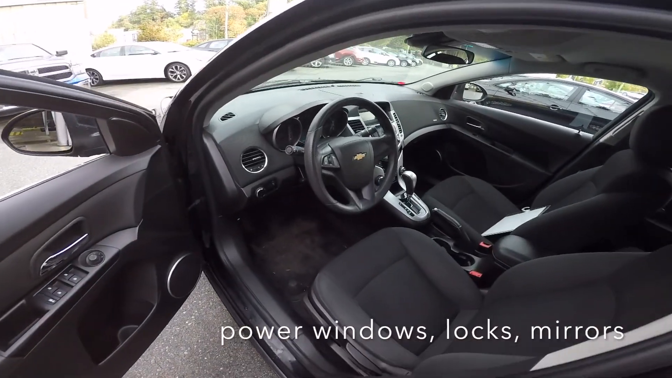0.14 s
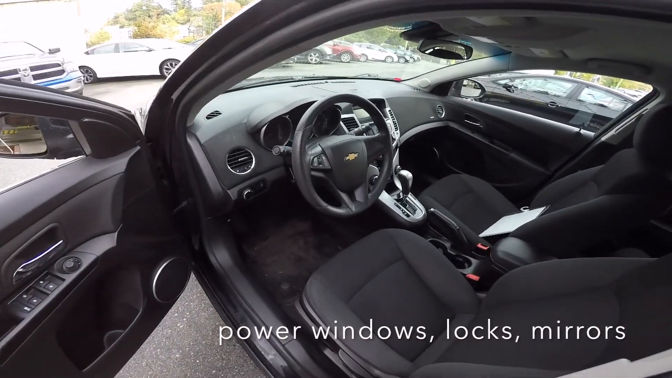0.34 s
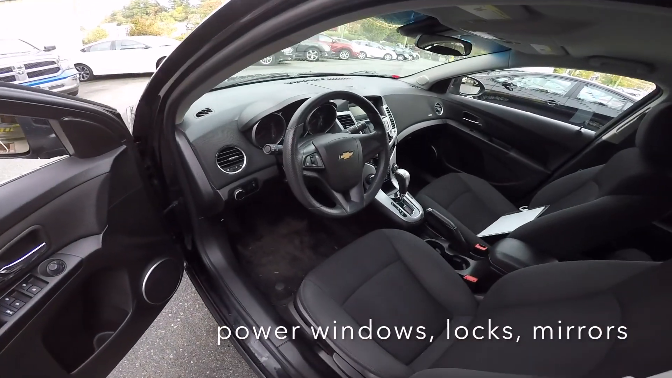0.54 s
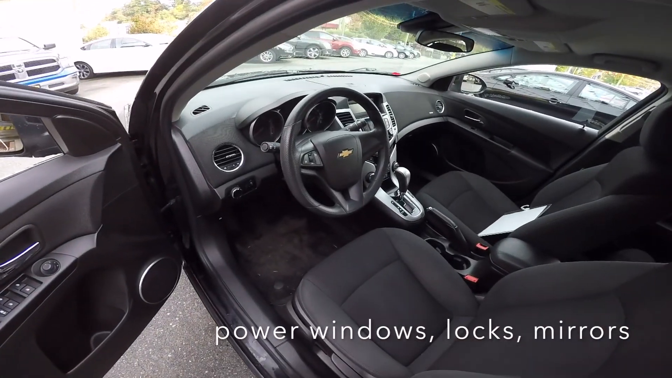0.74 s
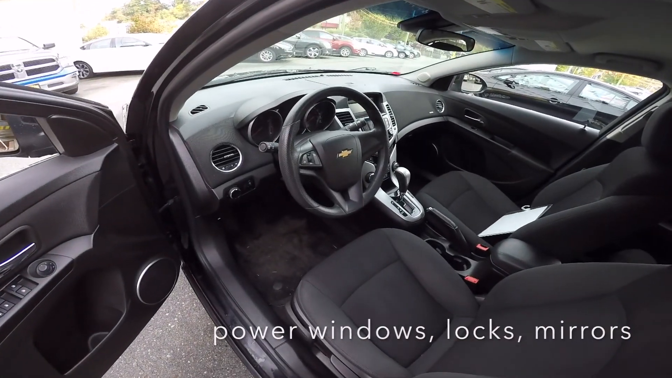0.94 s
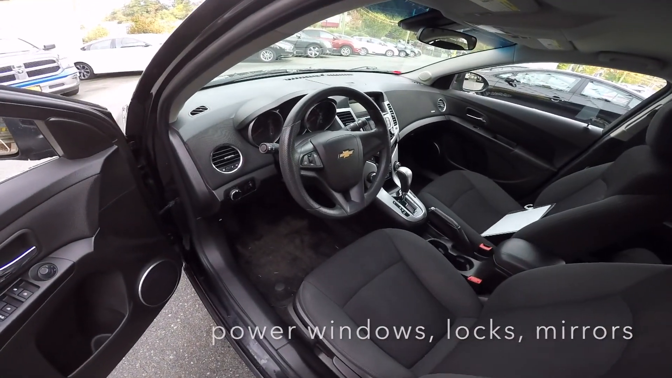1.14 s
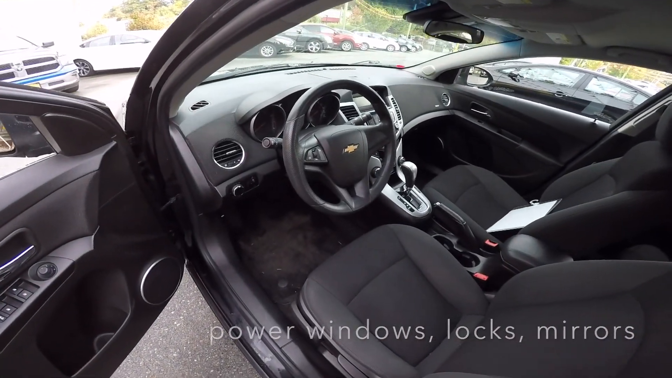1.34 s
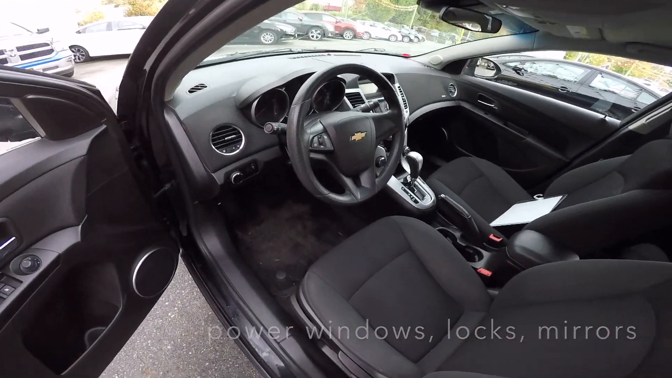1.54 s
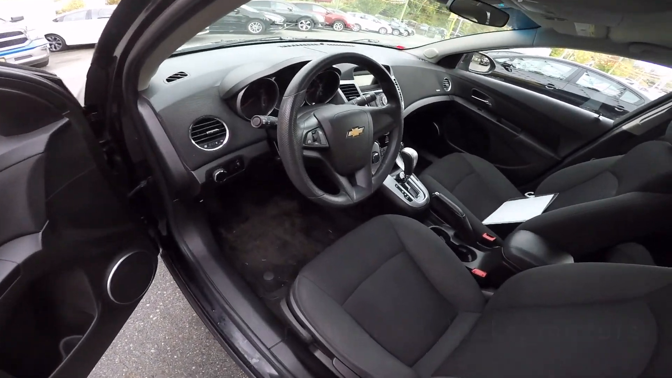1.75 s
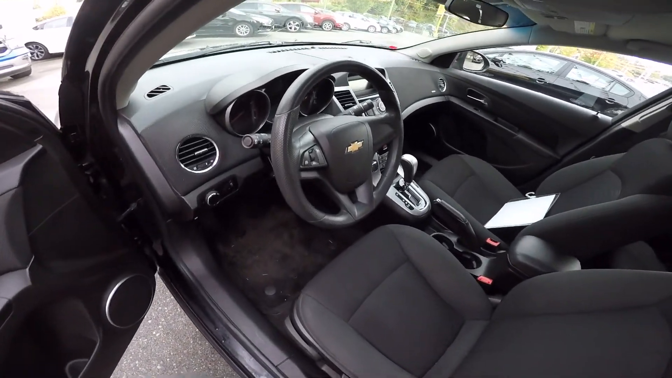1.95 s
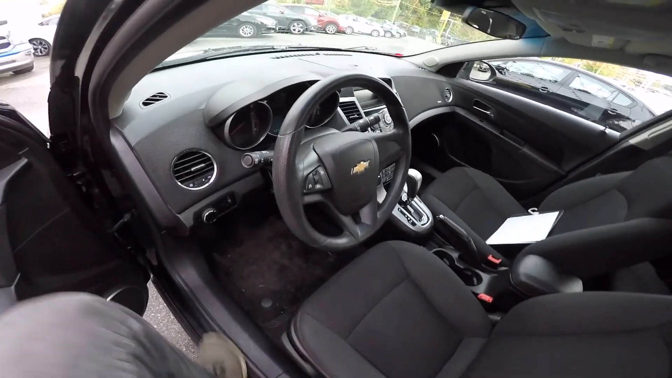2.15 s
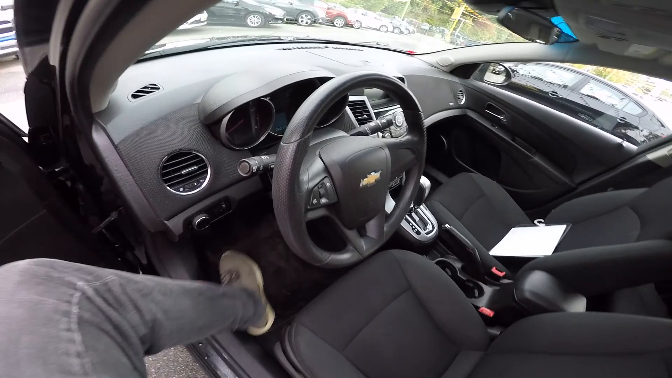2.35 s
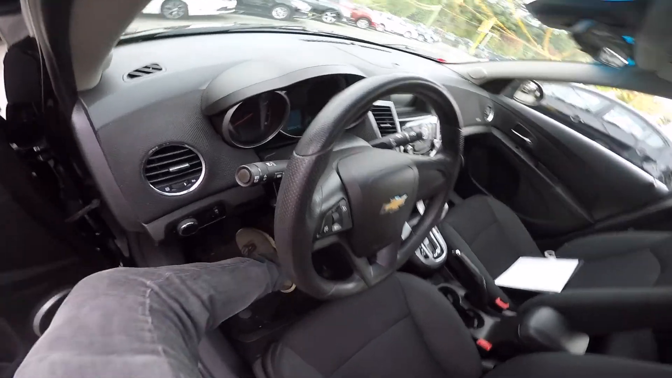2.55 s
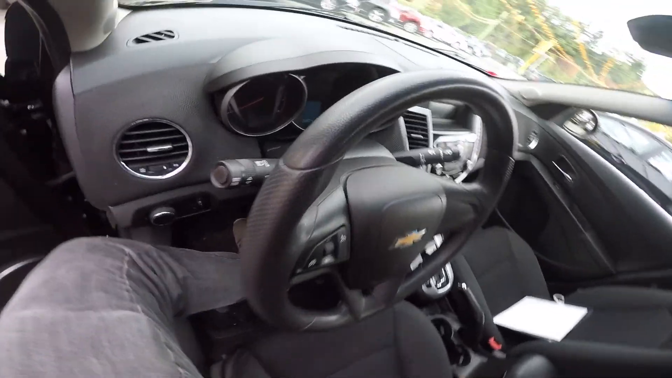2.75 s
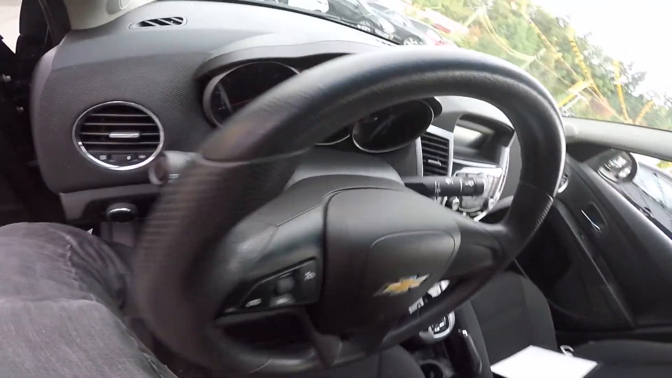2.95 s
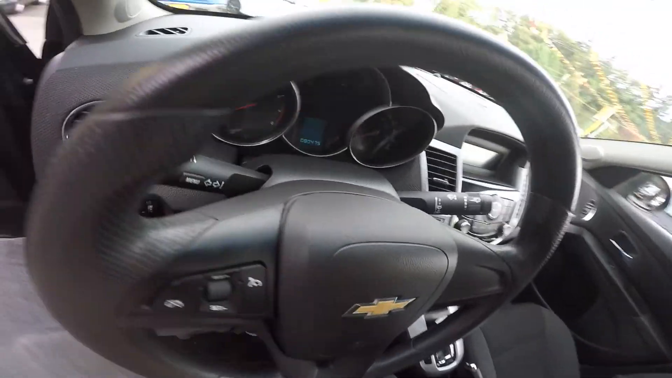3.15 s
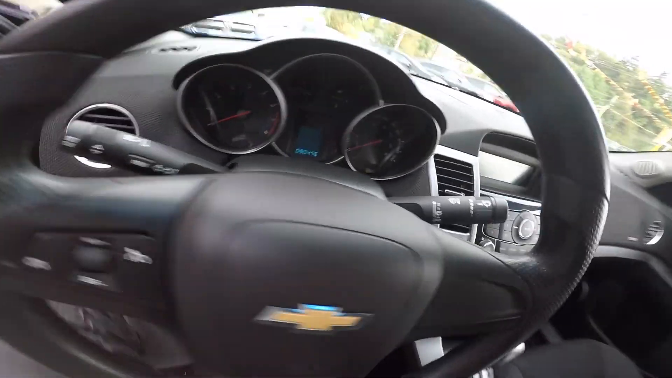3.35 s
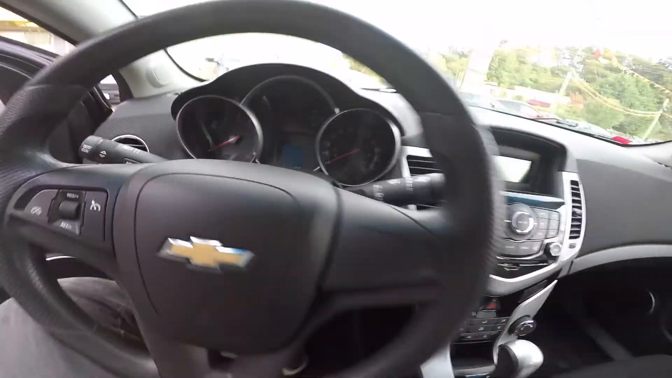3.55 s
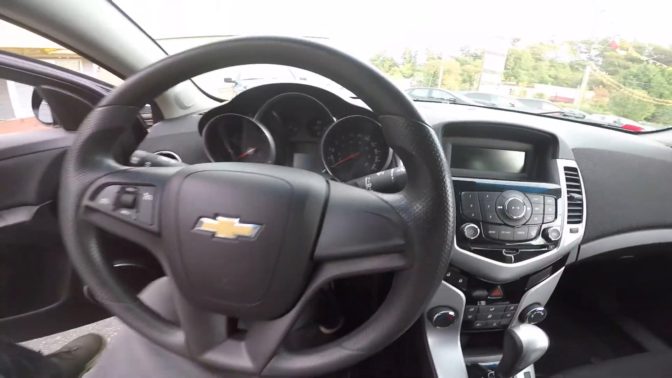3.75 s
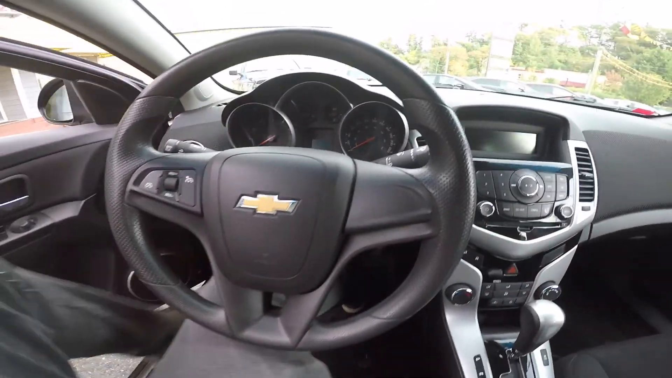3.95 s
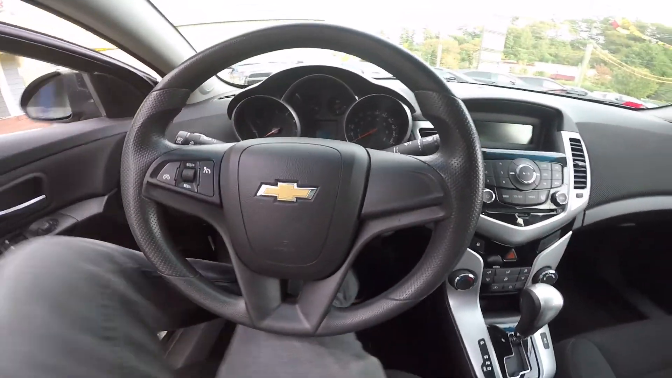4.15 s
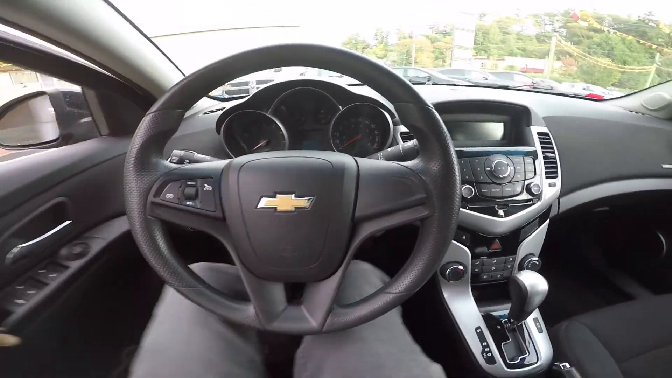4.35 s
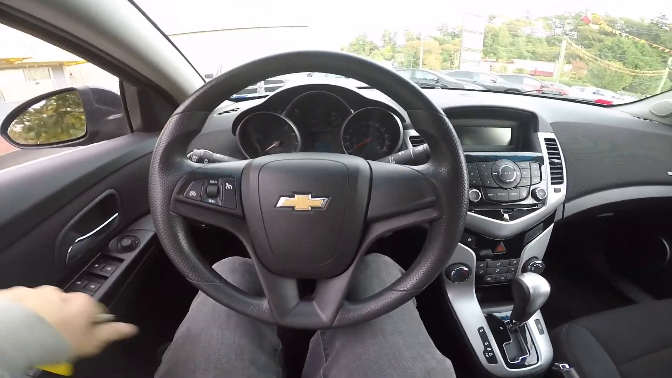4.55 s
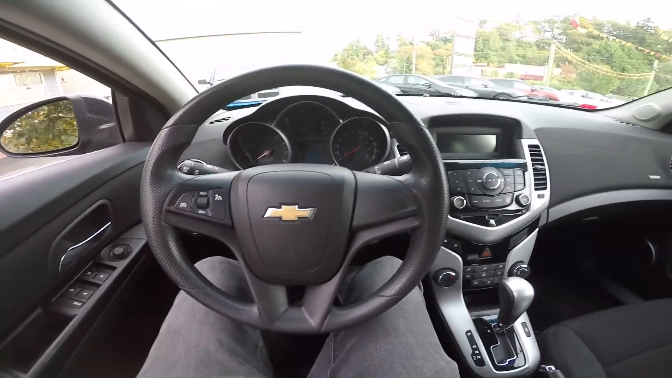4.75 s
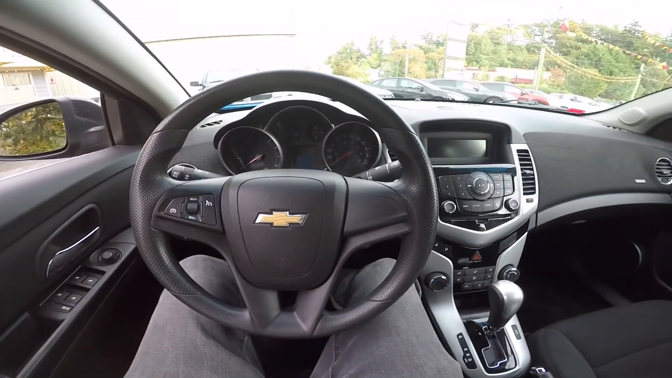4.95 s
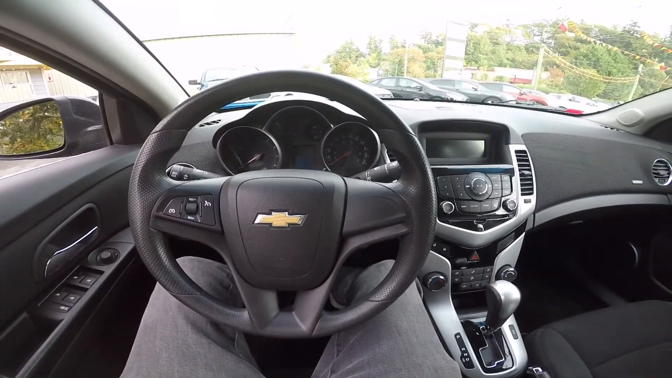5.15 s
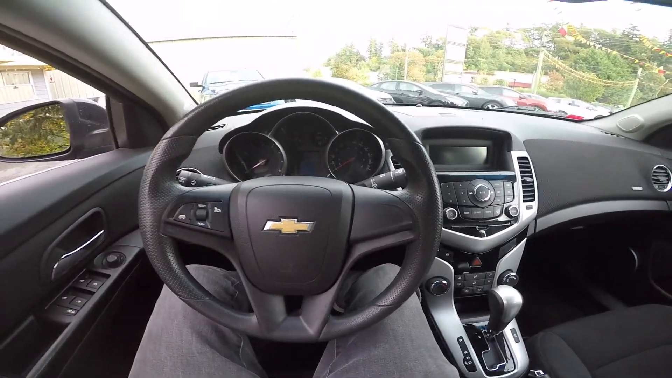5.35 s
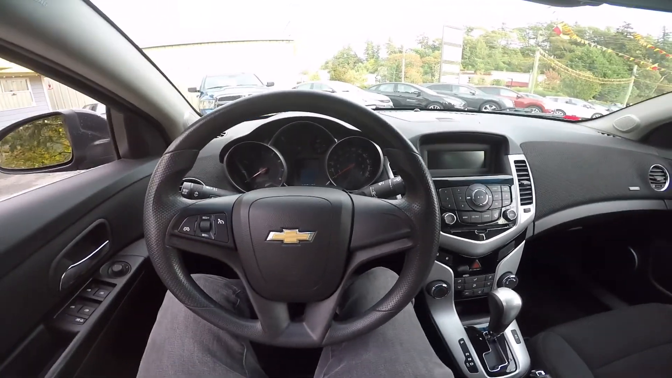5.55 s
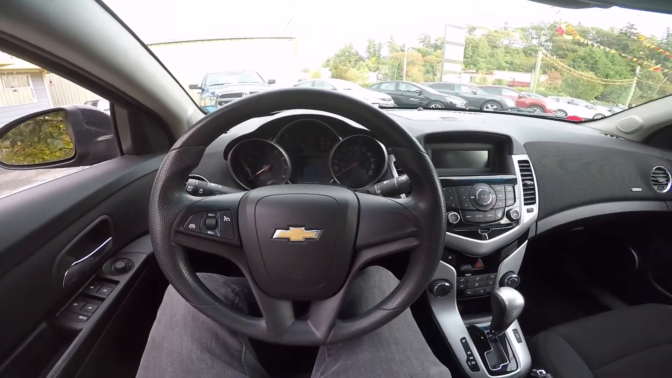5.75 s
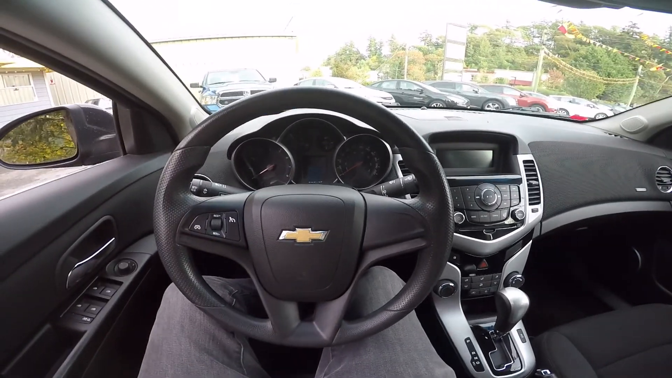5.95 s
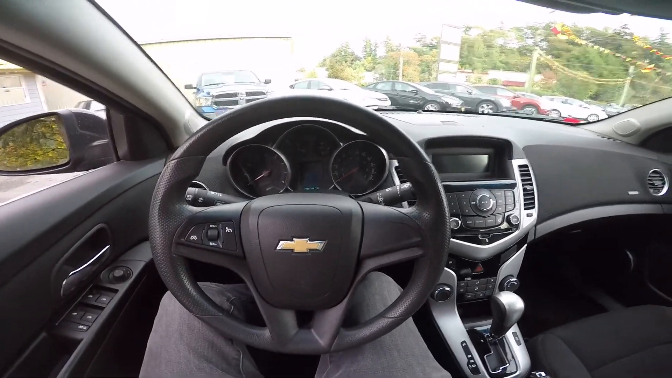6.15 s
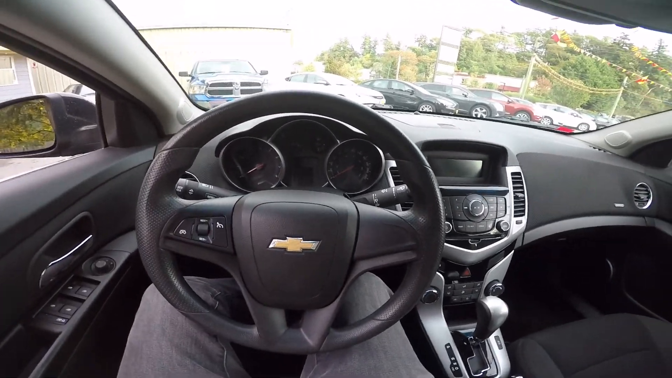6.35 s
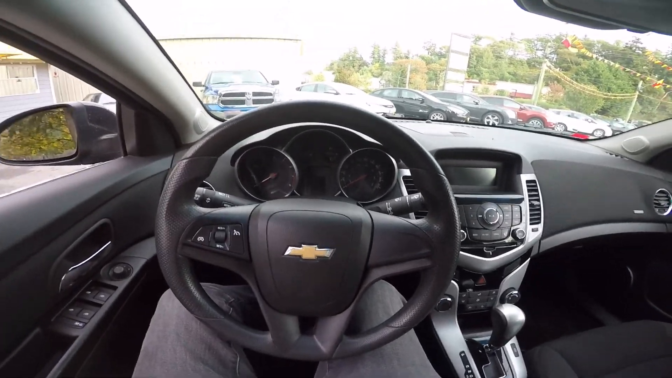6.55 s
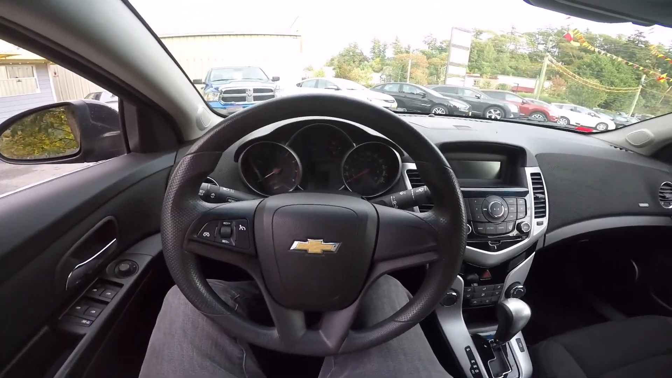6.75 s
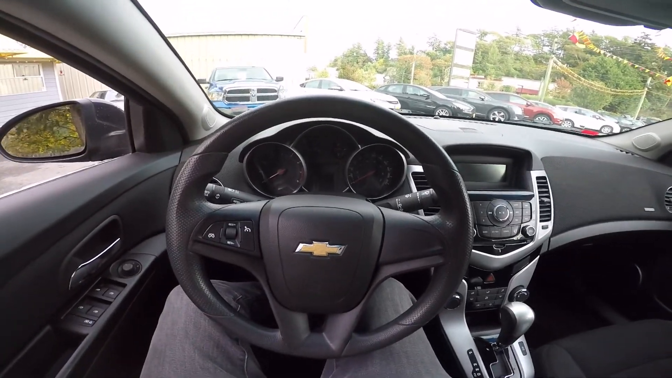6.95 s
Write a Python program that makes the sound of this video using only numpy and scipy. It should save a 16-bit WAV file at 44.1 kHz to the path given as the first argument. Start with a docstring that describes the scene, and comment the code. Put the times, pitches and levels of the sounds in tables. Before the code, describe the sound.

From 0 s, low wind rumble buffets a chest-worn microphone over a wavering traffic roar and a faint distant idling engine that slowly fades. Small scuffs come near 0.5 s, a very faint falling bird chirp at about 1.1 s and a soft knock at 1.75 s. From 2.3 s someone climbs into a car: a cluster of dull thumps, deep knocks at 2.6 s, a crisp scuff at 2.75 s. Seat shuffling, cloth rustle and more thumps run from 3.1 to 4.4 s, with a wind gust around 3.9 s. At 4.54 s the door slams, heavy and padded with a latch clack, brief trim rattle and low cabin bounce. The outside drops to a muffled hush by 5.1 s. From 5.3 to 6.7 s the plastic housing ticks, creaks and rubs very close, densest around 6.2 to 6.5 s, while traffic swells back and low wind returns by 7 s.

```python
"""Wind buffets, traffic roars, an engine idles far off and a bird chirps faintly; shoes and clothes scuff and thump
as the wearer of a two-port chest camera steps into a car; the door slams; in the quiet cabin the camera housing
creaks and ticks on its mount while the background swells again. Wind, traffic and scuffs are coloured noise, the
engine and bird are sines; thumps are damped tones, door and housing are modes rung by clicks and noise."""
import sys
import numpy as np
from scipy import signal
from scipy.fft import rfft, irfft, next_fast_len
from scipy.io import wavfile

SR = 44100
rng = np.random.default_rng(int(sys.argv[2]) if len(sys.argv) > 2 else 0)


def transcribe(u):
    """Save the signal u as a 16-bit wav file named by the first command-line argument.

    u: samples, shape (n,) or (channels, n), limited to [-1, 1]; the rate is SR.
    q: integer samples, one column per channel.
    """
    v = np.clip(np.atleast_2d(u).T, -1, 1)
    q = np.round(v * 32767).astype(np.int16)
    wavfile.write(sys.argv[1], SR, q)


N = 312648
PADDED = next_fast_len(N)

# the two ports for sound in air: f/Hz, left minus right/dB, phase by which left leads/rad, likeness/0-1
PORT_RESPONSE = [(60, -.5, 0, .99), (360, -1, -.1, .97), (500, -3.5, -.1, .95), (640, -5.5, 0, .92),
                 (780, -9, .6, .9), (950, -6, 1.3, .9), (1250, -1, 1.55, .75), (1950, 3, 1.4, .85),
                 (2450, 4, .4, .45), (3100, -1, -.2, .8), (4200, 0, -.1, .75), (7500, 1, 2.5, .3),
                 (12000, -1, 3, .1)]


def from_db(db):
    """dB to amplitude gain."""
    return 10 ** (np.asarray(db) / 20)


def rms_one(x):
    """Scale to rms 1."""
    return x / np.sqrt(np.mean(x ** 2) + 1e-20)


def in_time(rows):
    """Level column of a (time, level) table, interpolated per sample."""
    t_s, level = np.transpose(rows)
    return np.interp(np.arange(N) / SR, t_s, level)


def at_hz(points, hz, axis=1):
    """One table column interpolated over log frequency."""
    points = np.array(points)
    return np.interp(np.log(hz), np.log(points[:, 0]), points[:, axis])


def grid_hz():
    """FFT bin frequencies, floored at 1 Hz."""
    return np.maximum(np.arange(PADDED // 2 + 1) * SR / PADDED, 1)


def drift(corner_hz):
    """Slow random wander: noise through two one-pole low-passes at SR / 40; rms 1."""
    pole = np.exp(-2 * np.pi * corner_hz * 40 / SR)
    noise = rng.standard_normal(N // 40 + 2002)
    slow = signal.lfilter([1], [1, -2 * pole, pole * pole], noise)[2000:]   # settled part
    return np.interp(np.arange(N) / 40, np.arange(len(slow)), rms_one(slow))


def ring(clicks, hz, t60_s):
    """Two-pole resonator: a unit click starts a damped sine of height about 1."""
    r, w = from_db(-60 / (t60_s * SR)), 2 * np.pi * hz / SR
    return signal.lfilter([0, np.sin(w)], [1, -2 * r * np.cos(w), r * r], clicks + 1e-18)


def dying(clicks, t60_s):
    """Each click starts an envelope that falls 60 dB in t60_s."""
    return signal.lfilter([1], [1, -from_db(-60 / (t60_s * SR))], clicks + 1e-18)


def clicks_at(times_s, sizes):
    """Train of single-sample clicks."""
    out = np.zeros(N)
    out[np.round(np.asarray(times_s) * SR).astype(int)] = sizes
    return out


def air_noise(spectrum, likeness=1):
    """Coloured noise pair, rms 1; mid and side shares set how alike the ports are."""
    hz = grid_hz()
    alike = np.clip(likeness * at_hz(PORT_RESPONSE, hz, axis=3), 0, 1)
    mid, side = rfft(rng.standard_normal((2, PADDED))) * from_db(at_hz(spectrum, hz))
    pair = np.sqrt(1 + alike) * mid + np.sqrt(1 - alike) * side * [[1], [-1]]
    return rms_one(irfft(pair, PADDED)[:, :N])


def turn(pair, balance_db, lead_rad):
    """Split a level difference and a phase lead evenly between left and right."""
    half = from_db(balance_db / 2) * np.exp(.5j * lead_rad)
    return irfft(rfft(pair, PADDED) * [half, 1 / half], PADDED)[:, :N]


def wind():
    """Buffet on the ports: low noise with gusts, cut by the door and creeping back."""
    # buffet spectrum: f/Hz, relative density/dB per Hz
    buffet = [(8, -15), (18, 22), (30, 17.5), (50, 22), (80, 9.5), (130, 7), (250, -62.5)]
    # gust level: t/s, level/dB
    gusts = [(0, -19), (.7, -32.5), (1.3, -32.5), (2.3, -42.5), (3.0, -44), (3.53, -30.5), (3.9, -20.5),
             (4.28, -35.5), (4.5, -29.5), (4.9, -43.5), (5.15, -52.5), (6.0, -46.5), (6.65, -47.5),
             (7.09, -28.5)]
    return from_db(in_time(gusts) + 2.85 * drift(3.5)) * air_noise(buffet)


def traffic():
    """Two layers of wavering roar; the door muffles both, then they swell back."""
    # low roar spectrum: f/Hz, relative density/dB per Hz
    roar = [(35, 0.5), (60, -5), (103, -1), (140, -4.5), (172, -11.5), (189, -3.5), (220, -13.5),
            (447, -16), (616, -15.5), (1300, -43), (1690, -85.5)]
    # upper roar spectrum: f/Hz, relative density/dB per Hz
    upper_roar = [(470, -10), (800, -5), (997, -6.5), (1240, -11), (1590, -15.5), (2520, -30), (3180, -32),
                  (4820, -35), (9800, -31), (13500, -48.5), (14800, -68)]
    # drop as the door shuts, then the background swelling back: t/s, share/0-1
    muffling = [(4.5, 0), (4.62, 0.75), (5.15, 1), (6.0, 0.47), (7.09, 0.04)]
    open_db, upper_open_db = -30, -47.5
    loss_db, upper_loss_db = 25.5, 19   # at full muffling
    muffled = in_time(muffling)
    out = from_db(open_db - loss_db * muffled + drift(46)) * air_noise(roar)
    return out + from_db(upper_open_db - upper_loss_db * muffled + drift(4.2)) * air_noise(upper_roar)


def idling_engine():
    """Sines at multiples of a wavering firing rate; fades steadily, and the door shuts it out."""
    # engine orders: multiple of firing rate, relative level/dB
    orders = [(4, -34), (6, -34), (9, -42), (12, -39.5), (14, -42.5), (15, -48.5), (17, -46.5), (20, -48)]
    firing_hz, door_shut_s, shut_ramp_s = 18.5, 4.55, 0.087
    start_db, fade_db_per_s, shut_db = 4, 2.5, -18
    t = np.arange(N) / SR
    firing_phase = 2 * np.pi * np.cumsum(firing_hz * (1 + 0.00389 * drift(1.07))) / SR
    shut = np.clip((t - door_shut_s) / shut_ramp_s, 0, 1)
    idle_db = start_db - fade_db_per_s * t + shut_db * shut
    out = np.zeros(N)
    for order, level_db in orders:
        gain = from_db(level_db + idle_db + 2.65 * drift(3.4))
        out += gain * np.sin(round(order) * firing_phase + rng.uniform(0, 2 * np.pi))
    return out


def bird():
    """Faint far chirp: a falling, wavering sine under a half-sine arch."""
    start_s, length_s, level_db = 1.13, .28, -68
    start_hz, fall_hz_per_s = 3330, 1200
    since_s = np.arange(N) / SR - start_s
    arch = np.sin(np.pi * np.clip(since_s / length_s, 0, 1))
    hz = start_hz - fall_hz_per_s * np.clip(since_s, 0, 1) + 110 * drift(35)
    return arch * from_db(level_db + 5 * drift(45)) * np.sin(2 * np.pi * np.cumsum(hz) / SR)


def scuffing():
    """Fibres slip in clumps: crackling hiss and duller body per stroke, over the seat noise of shifting weight."""
    # cloth and shoe strokes: start/s, length/s, hiss/dB, body/dB
    strokes = [(0.464, 0.014, -58, -66), (0.546, 0.011, -55, -37.5), (1.974, 1, -63, -62),
               (2.318, 0.021, -54, -41), (2.336, 0.065, -48.5, -42), (2.746, 0.007, -45, -47),
               (2.753, 0.0093, -36, -34.5), (2.763, 0.01, -30, -27), (2.774, 0.011, -35, -34.5),
               (2.777, 0.043, -48.5, -41), (2.81, 0.04, -46, -39), (2.839, 0.05, -47.5, -40),
               (2.975, 0.034, -53.5, -54), (3.008, 0.02, -51, -68), (3.24, 0.033, -56, -46),
               (3.483, 0.068, -53.5, -67), (3.503, 0.22, -63.5, -44), (3.736, 0.049, -58, -49),
               (4.109, 0.49, -56, -44.5), (6.4, 0.045, -57, -45), (6.47, 0.19, -67, -49)]
    # fibre hiss spectrum: f/Hz, relative density/dB per Hz
    hiss_colour = [(2000, -30.5), (3300, -2.5), (3650, -3.5), (4000, -6), (4800, -11), (5600, -3),
                   (6400, -2.5), (7400, -1), (8800, -14.5), (10500, -21), (15000, -55)]
    # stroke body spectrum: f/Hz, relative density/dB per Hz
    body_colour = [(400, 6.5), (850, 8.5), (1150, -1.5), (1400, -2.5), (2050, -2), (2700, -14), (5000, -38)]
    # weight working seat and sill: t/s, level/dB
    shuffle_level = [(2.2, -76), (2.6, -34), (3.27, -58), (3.31, -28), (3.65, -30.5), (3.9, -29.5),
                     (4.15, -30.5), (4.3, -27.5), (4.46, -24.5), (4.5, -37.5), (5.15, -59)]
    # seat spectrum: f/Hz, relative density/dB per Hz
    seat_colour = [(40, -1), (110, 7.5), (200, -3), (450, -3.5), (650, -8), (1000, -54)]
    rise_share = .25   # of the stroke length
    snaps_per_s, crackle_share = 1100, .4
    seat_likeness = .85   # close and spread out, so the ports agree less

    t, hiss, body = np.arange(N) / SR, np.zeros(N), np.zeros(N)
    for s, length_s, hiss_db, body_db in strokes:
        stroke = np.interp(t, [s, s + length_s * rise_share, s + length_s], [0, 1, 0]) ** .5
        hiss += from_db(hiss_db) * stroke
        body += from_db(body_db) * stroke

    # single fibres snap within the hiss
    snap_db = 4 * np.minimum(rng.exponential(1, N), 4)
    snaps = (rng.random(N) < snaps_per_s / SR) * from_db(snap_db)
    crackle = 1 - crackle_share + crackle_share * rms_one(dying(snaps, .004))
    hiss *= crackle * from_db(2 * drift(120))
    body *= crackle * from_db(2 * drift(90))
    shuffle = from_db(in_time(shuffle_level) + 4.4 * drift(22)) * air_noise(seat_colour, seat_likeness)
    return hiss * air_noise(hiss_colour) + body * air_noise(body_colour) + shuffle


def thumps():
    """Each knock is a dull damped ring, rougher the higher it sits, with a short noise crack on top."""
    # body, feet and door knocking on the car: t/s, ring level before dulling/dB, ring f/Hz, crack/dB
    knocks = [(1.744, -23.5, 610, -54), (1.754, -11, 94, -64), (2.292, -5, 111, -69),
              (2.319, -19.5, 594, -25), (2.328, -8, 546, -57), (2.347, -18.5, 640, -21),
              (2.611, -4, 137.8, -30.5), (2.66, 0, 38.32, -58), (3.129, -18.5, 550, -43),
              (3.296, -11, 556, -27), (3.302, -13, 179, -53), (3.321, -11, 105, -70),
              (3.742, -26, 639, -31), (3.817, -7.5, 147, -37), (3.875, -18.5, 610, -55),
              (3.901, -13, 90, -29.5), (3.963, -4, 53, -50), (4.044, -22, 391, -34.5),
              (4.446, -23, 428, -34.5), (5.075, -31.5, 113, -77), (5.76, -20.5, 172, -83),
              (6.964, -19, 140, -35)]
    # crack spectrum: f/Hz, relative density/dB per Hz
    crack_colour = [(300, -1.5), (650, 15.5), (1100, -0.5), (1800, -2.5), (2400, -21), (4000, -23),
                    (12000, -53)]
    t60_at_100_hz_s, t60_slope = 0.066, -0.12   # slope: power of pitch
    crack_rise_s, crack_t60_s = 0.00068, 0.082

    out, crack = np.zeros((2, N)), air_noise(crack_colour)
    t = np.arange(SR // 3) / SR
    for s, level_db, hz, crack_db in knocks:
        i = round(s * SR)
        n = min(len(t), N - i)
        t60_s = t60_at_100_hz_s * (hz / 100) ** t60_slope
        wobble = rms_one(signal.lfilter([1], [1, -1.96, .9604], rng.standard_normal(len(t))))
        phase = 2 * np.pi * hz * t + .45 * np.minimum(hz / 500, 1) * wobble
        attack = np.minimum(t * hz * 1.94, 1)   # about half a cycle
        tone = from_db(level_db - 60 * t / t60_s) * attack * np.sin(phase)
        padding = signal.butter(4, 1.4 * hz + 150, fs=SR, output="sos")   # padded trim dulls it
        tone = signal.sosfilt(padding, tone)
        crack_level = np.minimum(t / crack_rise_s, 1) * from_db(crack_db - 60 * t / crack_t60_s)
        out[:, i:i + n] += tone[:n] + crack_level[:n] * crack[:, i:i + n]
    return out


def door():
    """Each contact rings the door's modes and shakes it as noise dying band by band; the cabin bounces slowly."""
    # door meets seal, latch and frame, then trim rattles: t/s, panel/dB, latch/dB
    contacts = [(4.536, -5.5, -17), (4.548, -3.5, 7), (4.556, -2.5, -1), (4.564, -10.5, -10),
                (4.6, -29, -17.5), (4.626, -17.5, -15.5), (4.656, -18.5, -27), (4.73, -27, -33),
                (4.933, -40, -20.5)]
    # shaking bands: f/Hz, relative level/dB, t60/s
    shake_bands = [(56.6, -24.5, 0.89), (118, -20, 0.31), (226, -27, 0.45), (482, -20.5, 0.15),
                   (820, -25.5, 0.081), (1460, -37, 0.061), (2200, -37, 0.026), (3170, -50.5, 0.05),
                   (4970, -45.5, 0.028)]
    # skin and latch modes: f/Hz, relative level/dB, t60/s
    skin_modes = [(133, -4, 0.11), (212.5, -12.5, 0.11), (327, -18.5, 0.13), (429, -10.5, 0.067),
                  (586, -20.5, 0.091), (910, -24.5, .04), (1017, -26, 0.058), (1440, -39, 0.026),
                  (1854, -31.5, 0.033), (2370, -37, 0.015), (3410, -40, .016)]
    # bounce of cabin air and springs: f/Hz, relative level/dB, t60/s
    cabin_modes = [(16.85, -14.5, 1.26), (32.4, -36, 1.2)]
    latch_from_hz = 1100   # the latch drives the upper bands and modes, the panel the rest

    times_s, panel_db, latch_db = np.transpose(contacts)
    panel, latch = clicks_at(times_s, from_db(panel_db)), clicks_at(times_s, from_db(latch_db))
    out = np.zeros(N)
    for hz, level_db, t60_s in shake_bands:
        band = signal.butter(2, [hz / 1.344, hz * 1.21], "band", fs=SR, output="sos")
        shaking = dying(panel if hz < latch_from_hz else latch, t60_s) * rng.standard_normal(N)
        out += from_db(level_db) * np.sqrt(SR / hz) * signal.sosfilt(band, shaking)   # evens out bandwidth

    alternating = (-1) ** np.arange(len(times_s))
    for hz, level_db, t60_s in skin_modes:
        hit_db = (panel_db if hz < latch_from_hz else latch_db) + 1.5 * rng.standard_normal(len(times_s))
        hit_s = times_s + .003 * rng.random(len(times_s))
        blows = clicks_at(hit_s, from_db(hit_db) * alternating)
        seals = signal.butter(1, [hz / 1.4, hz * 1.4], "band", fs=SR, output="sos")   # rubber softens contact
        out += from_db(level_db) * signal.sosfilt(seals, ring(blows, hz, t60_s))

    soft = signal.lfilter([.01], [1, -.99], panel)
    for hz, level_db, t60_s in cabin_modes:
        out += from_db(level_db) * ring(soft, hz, t60_s)
    return out


def housing():
    """Ticks and rubbing ring the plastic's modes and move the two capsules nearly in opposition."""
    # ticks: t/s, click/dB, edge re click/dB, push on body/dB, ping re click/dB, jolt of mount/dB
    ticks = [(3.4255, -49.5, -23, -37.5, 6, -36.5), (3.916, -42.5, -28, -43, 5.5, -48),
             (4.0544, -41, -42, -28, -17, -39.5), (5.3375, -36.5, -36, -41, -10, -43.5),
             (5.3435, -46.5, -38, -35.5, -14, -43.5), (5.369, -60, -36, -57, -13, -58),
             (5.391, -45, -10, -44, -2, -51), (5.42, -45, -14, -47.5, -4, -50.5),
             (5.445, -45, -38, -49, -15, -53), (5.4557, -41, -22, -52, 2, -62),
             (5.491, -51.5, -7, -41, -5, -54), (5.521, -53, -9, -42.5, -7, -53.5),
             (5.5883, -44.5, -21, -48, -12, -47), (6.0333, -38.5, -15, -43.5, -12, -44),
             (6.063, -53, -30, -41.5, -8, -48), (6.0906, -49.5, -30, -48, 3.5, -59),
             (6.1092, -52, -37, -40, -3, -39), (6.201, -33, -15, -34, -10, -33.5),
             (6.2152, -62, -22, -47, -9, -42.5), (6.2329, -50, -15, -46, -6, -37),
             (6.279, -48, -18, -45, -13, -47), (6.3001, -39, -13.5, -37, -21, -47),
             (6.3522, -49, -19, -40.5, -8, -43.5), (6.4066, -42.5, -14.5, -47, -5, -38.5),
             (6.4391, -44, -18, -48, -14, -48), (6.468, -47, -8, -46, -10, -43),
             (6.7331, -42.5, -11.5, -32, 10, -40.5)]
    # mount rubbing on housing: start/s, length/s, level/dB, edge re level/dB
    rubs = [(5.72, 1, -37.5, -47), (6.38, 0.14, -33, -30.5)]
    # mount modes: f/Hz, left/dB, right/dB, t60/s
    mount_modes = [(90, -14, -2.5, 0.063), (152, -12, -2.5, 0.092)]
    # body modes: f/Hz, left/dB, right/dB, t60/s
    body_modes = [(284, -7, 1.5, 0.024), (454, 5.5, 1, 0.051), (607, 8.5, 6, 0.025)]
    # click modes: f/Hz, left/dB, right/dB, t60/s
    click_modes = [(770, 4, 4.5, 0.013), (1080, 2.5, 5, 0.012), (1340, 11, 7, 0.014),
                   (1910, 5, 6.5, 0.0063), (2660, -8, -6.5, 0.005)]
    # ping modes: f/Hz, left/dB, right/dB, t60/s
    ping_modes = [(2090, -2, -3, 0.023), (2210, -5, -7, 0.012)]
    # edge modes: f/Hz, left/dB, right/dB, t60/s
    edge_modes = [(3220, 11, 8, 0.0064), (4320, -4, 7, 0.0075), (5660, 4, -7, 0.0013),
                  (7520, -7, 16, 0.0017)]
    # capsule phase: f/Hz, phase by which left leads/rad
    capsule_lead = [(100, 2.28), (900, 2.73), (1800, 1.98)]
    tick_rise_s = 0.00066

    t = np.arange(N) / SR
    times_s, click_db, edge_db, body_db, ping_db, jolt_db = np.transpose(ticks)
    slips = (rng.random(N) < 3000 / SR) * rng.standard_normal(N) * from_db(3 * drift(20))   # 3000 per s
    dull, sharp = np.zeros(N), np.zeros(N)
    for s, length_s, level_db, sharp_db in rubs:
        arch = np.sin(np.pi * np.clip((t - s) / length_s, 0, 1)) ** 2
        dull += slips * from_db(level_db) * arch
        sharp += slips * from_db(level_db + sharp_db) * arch

    # modes, tick level/dB, rub drive, burst t60/s
    groups = (("mount", mount_modes, jolt_db, 0, .006),
              ("body", body_modes, body_db, from_db(-21) * dull, .006),
              ("click", click_modes, click_db, from_db(-26) * dull, .007),
              ("ping", ping_modes, click_db + ping_db, from_db(-48) * dull, .008),
              ("edge", edge_modes, click_db + edge_db, sharp, .008))
    out, rise_pole = np.zeros((2, N)), np.exp(-1 / (tick_rise_s * SR))
    for name, modes, hit_db, rub, burst_t60_s in groups:
        group = np.zeros((2, N))
        for hz, left_db, right_db, t60_s in modes:
            sizes = from_db(hit_db + 2 * rng.standard_normal(len(times_s)))   # ticks weigh modes anew
            burst = dying(clicks_at(times_s, sizes), burst_t60_s)
            burst = signal.lfilter([1 - rise_pole], [1, -rise_pole], burst)
            if name == "ping":
                chatter = .2 * np.cos(2 * np.pi * hz * t)   # the slips lock to the ring
            elif name in ("mount", "body"):
                hold = SR // 20   # pushed one way at a time
                chatter = np.repeat(np.sign(rng.standard_normal(N // hold + 1)), hold)[:N]
            else:
                channels = 2 if name == "edge" else 1   # high modes differ per capsule
                chatter = np.sign(rng.standard_normal((channels, N)))
            group += from_db([[left_db], [right_db]]) * ring(burst * chatter + rub, hz, t60_s)
        limits_hz = [modes[0][0] * 0.81, modes[-1][0] * 1.16]
        out += signal.sosfilt(signal.butter(3, limits_hz, "band", fs=SR, output="sos"), group)
    return turn(out, 0, at_hz(capsule_lead, grid_hz()))


def scene():
    """Sound in air passes the two ports; sound in the housing bypasses them."""
    air = wind() + traffic() + idling_engine() + bird() + scuffing() + thumps() + door()
    hz = grid_hz()
    through_ports = turn(air, at_hz(PORT_RESPONSE, hz, axis=1), at_hz(PORT_RESPONSE, hz, axis=2))
    return through_ports + housing()


def record(dry):
    """Add faint low-tilted hiss, round the peaks, cut off the top."""
    hiss_drive_db, stop_hz = -101.5, 15000   # drive: before the tilt
    hiss = from_db(hiss_drive_db) * signal.lfilter([1], [1, -.7], rng.standard_normal((2, N)))
    rounded = 0.58 * np.tanh((dry + hiss) / 0.59)
    return signal.sosfilt(signal.cheby2(12, 70, stop_hz, fs=SR, output="sos"), rounded)


dry = scene()
out = record(dry)
transcribe(out)
```